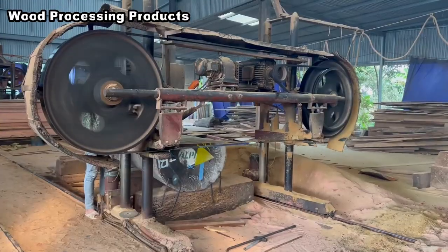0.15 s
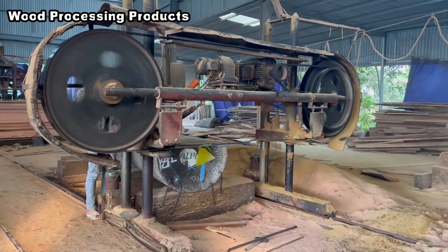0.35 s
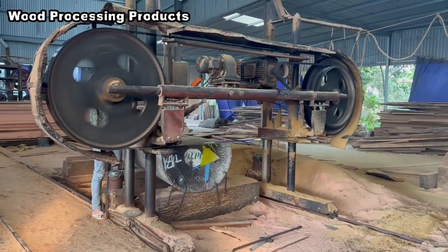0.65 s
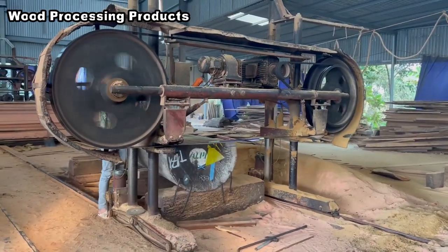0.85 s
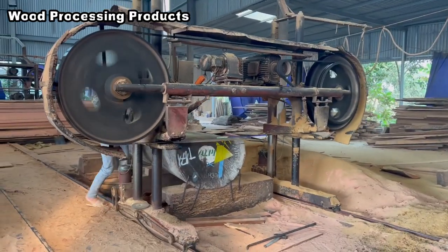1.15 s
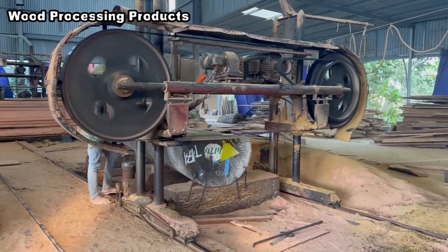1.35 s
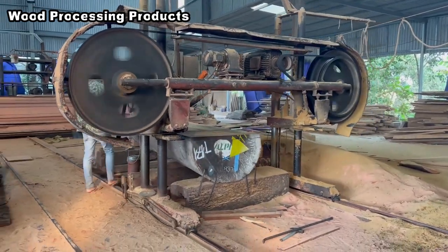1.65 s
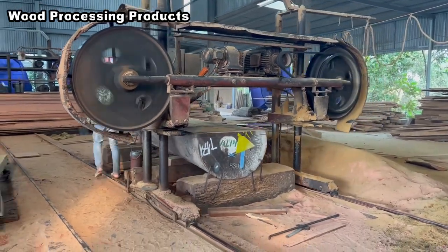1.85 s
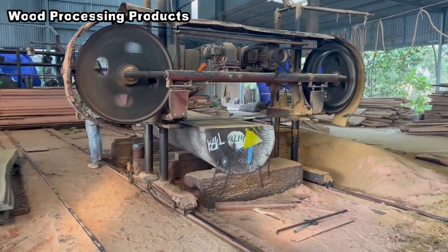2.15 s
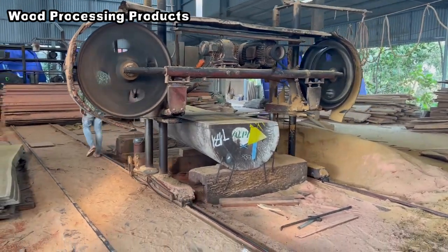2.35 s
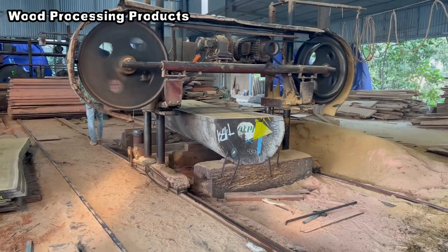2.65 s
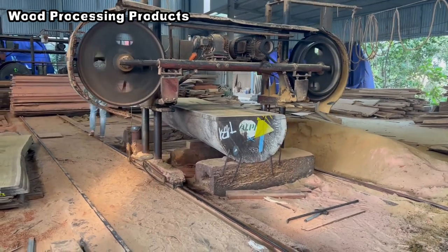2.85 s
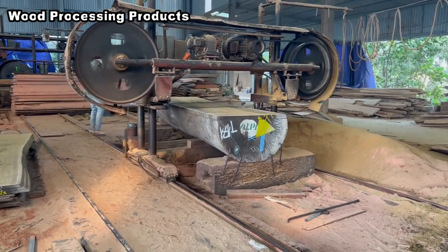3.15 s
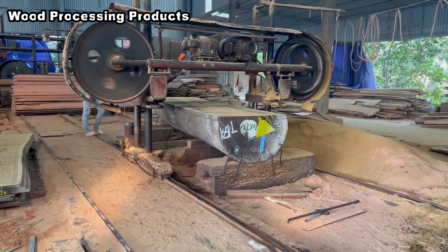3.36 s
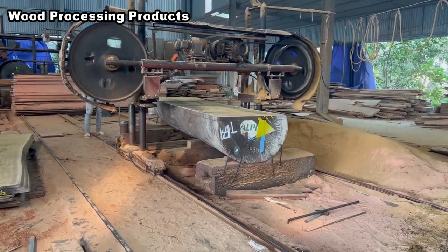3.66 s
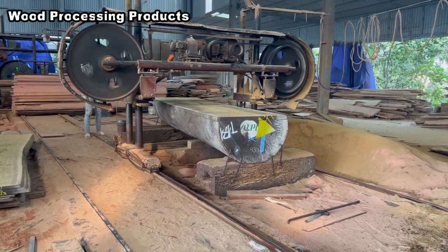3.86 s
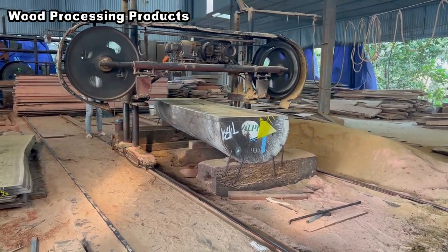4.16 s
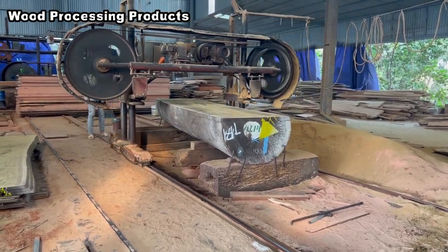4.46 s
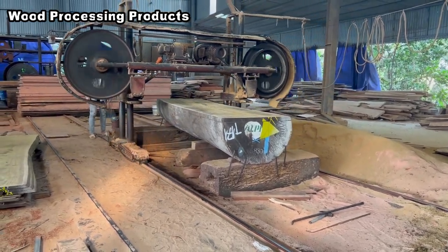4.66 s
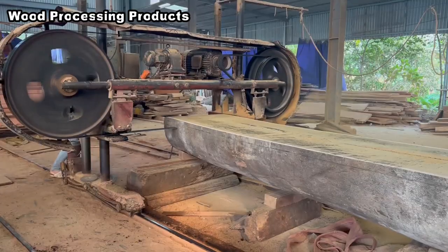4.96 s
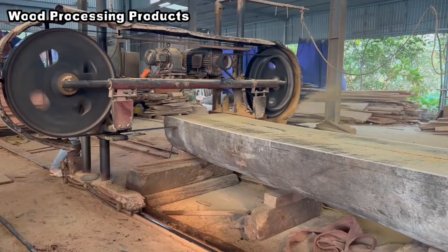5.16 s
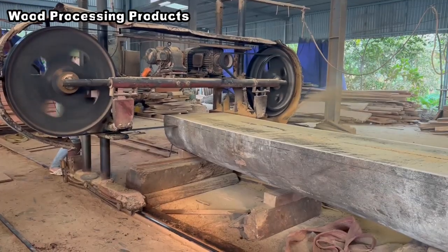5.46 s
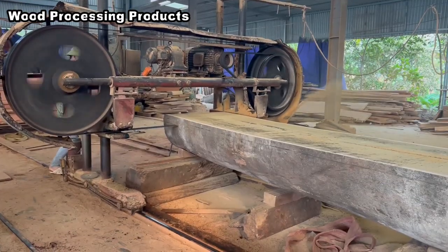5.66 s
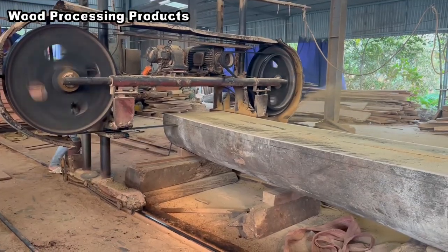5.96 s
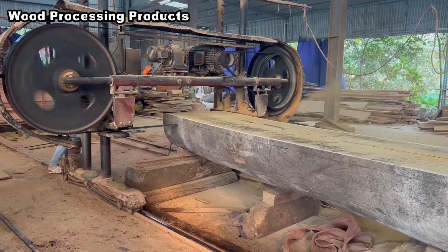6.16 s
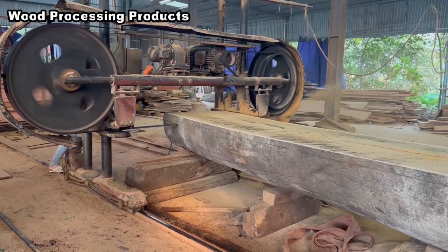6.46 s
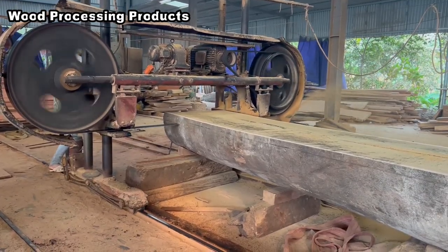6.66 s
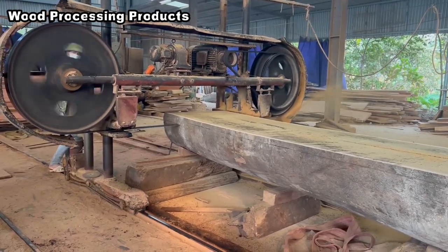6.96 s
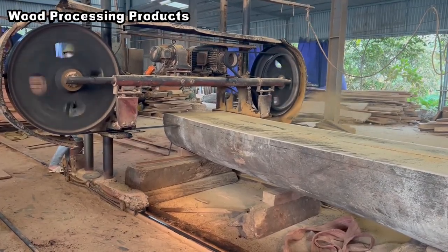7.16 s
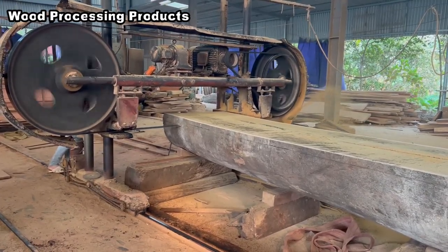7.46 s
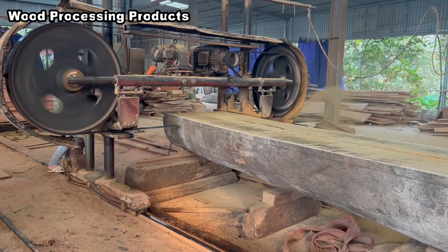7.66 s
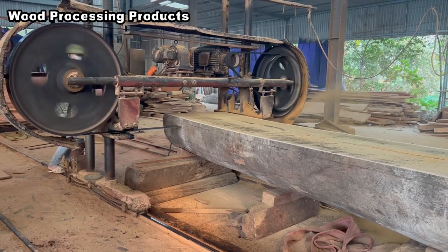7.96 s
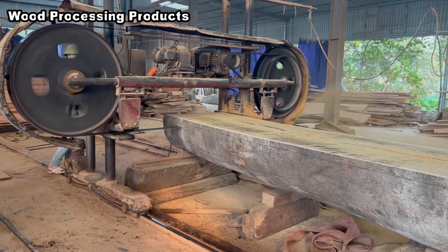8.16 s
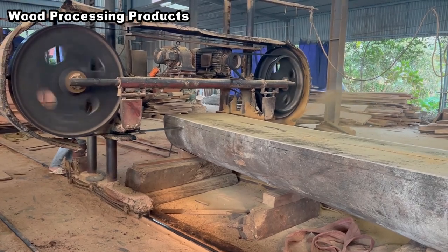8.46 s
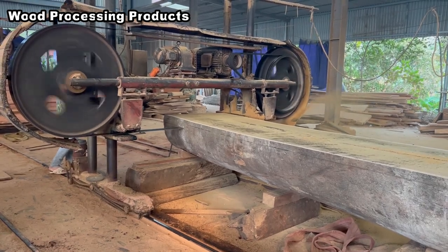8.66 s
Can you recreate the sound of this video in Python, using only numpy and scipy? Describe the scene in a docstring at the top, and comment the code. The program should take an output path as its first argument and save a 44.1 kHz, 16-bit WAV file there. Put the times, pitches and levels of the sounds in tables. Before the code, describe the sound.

A big band saw runs free in a timber shed, a little right of the microphone. From the start its steel band hisses and rings over a steady drive rumble, with thin wavering squeals and brief scrapes that swell around 1 second. At about 1.6 seconds the carriage jolts off with a quick, echoing clatter, then hums as it rolls. More faint squeals and rubbing come between 3 and 4.5 seconds. Just before 5 seconds the level dips for an instant, and abruptly the saw is cutting a log. The teeth give a thin, high whine that flutters rapidly under a bright, steady hiss of sawdust, while the band keeps ringing. The bite is slightly harder at first and eases around 6 seconds. The cutting continues to the end, near 9 seconds, with only a weak, patchy low rumble beneath it.

```python
"""A steel band hisses and rings through its guides: a big horizontal band saw running free in a tin-roofed
timber shed, a little right of the microphone. The drive rumbles; the carriage sets off with a clatter and
hums as it rolls back over the log. The level dips briefly near five seconds, then the saw is in the cut:
the teeth whine, fluttering with each turn of the wheels, under a bright hiss of sawdust. The recorder's
noise suppression leaves the cut thin, its low rumble weak and patchy."""
import sys
import numpy as np
from scipy import signal
from scipy.fft import rfft, irfft, next_fast_len
from scipy.io import wavfile
from scipy.ndimage import uniform_filter1d

SR = 44100
rng = np.random.default_rng(int(sys.argv[2]) if len(sys.argv) > 2 else 0)


def store_pcm(level_fs):
    """Save levels as 16-bit WAV."""
    pcm = np.round(np.clip(level_fs, -1, 1) * 32767).astype(np.int16)
    wavfile.write(sys.argv[1], SR, np.atleast_2d(pcm).T)


N = 388521
T = np.arange(N) / SR
SIZE = next_fast_len(N, real=True)
HZ = np.maximum(np.arange(SIZE // 2 + 1) * SR / SIZE, 1)

WHEEL_HZ, TOOTH_HZ = 6.19, 1101
ROLL_S, CUT_S = 1.53, 4.945  # the carriage sets off; the cut begins

# Bending modes of the steel band. Each row: pitch in Hz, relative dB running free, the same in the cut.
BAND_MODES = [(1524, -56, -60), (1647, -55, -58), (1819, -58, -59), (1879, -59, -63), (1948, -56, -56.5),
              (2033, -55, -62), (2085, -60, -57), (2221, -59, -57), (2343, -61, -61), (2544, -58, -71),
              (2605, -57, -64), (3071, -61, -62), (3216, -58, -58), (3252, -59, -60), (3357, -59, -59),
              (3507, -59, -59), (3646, -61, -58), (4317, -67, -59), (4463, -61, -64), (4535, -60, -78),
              (5133, -61, -60), (5209, -64, -60), (5285, -59, -63), (5365, -60, -64), (5445, -58, -70),
              (5516, -61, -66), (5674, -63, -68), (5830, -63, -68), (5905, -61, -63), (6059, -59, -64),
              (6135, -61, -60), (6626, -63, -65)]


def tooth_whine():
    """Teeth strike the wood in turn, in spurts that come round with the wheels; torn fibres rasp."""
    # Partials of the tooth rate. Each row: multiple, tone in dB, warble depth in Hz, then the rasp's
    # centre in Hz, width in Hz and level in dB.
    partials = [(1, -4.8, 6, 1170, 130, -5.4), (2, -2.8, 28, 2260, 160, -3), (3, -19, 40, 3400, 200, -19)]
    # Spurts of biting. Each row: place in the turn from 0 to 1, half-length in turns, pitch rise as
    # a share, fundamental in dB, overtones in dB.
    spurts = [(.03, .06, 0, -3, 1), (.12, .035, 0, -10, -4), (.2, .055, 0, 0, -2),
              (.29, .045, .003, -7, -2), (.4, .06, 0, 0, -2), (.54, .05, -.004, -6, -5),
              (.67, .04, .012, -3, -16), (.755, .045, 0, -8, -1), (.825, .04, .05, -5, -1),
              (.92, .045, .012, -9, -5)]
    turn = (T - 5.0) * WHEEL_HZ + .014 * walk(4)
    pulses = [np.exp(-(((turn - at + .5) % 1 - .5) / length) ** 2) for at, length, *_ in spurts]
    pitch_rise = sum(rise * pulse for (_, _, rise, _, _), pulse in zip(spurts, pulses))
    pace = 1 + pitch_rise + .007 * walk(600)
    chatter = undb(3 * walk(130))
    out = 0
    for k, tone_db, warble_hz, rasp_hz, width_hz, rasp_db in partials:
        phase = 2 * np.pi * np.cumsum(k * TOOTH_HZ * pace + warble_hz * walk(70)) / SR
        tone = np.sqrt(2) * np.sin(phase) * undb(tone_db)
        rasp = noise(np.sqrt(resonance(rasp_hz, width_hz))) * undb(rasp_db)
        bite = undb(-18)  # the floor between spurts
        for (*_, fundamental_db, overtone_db), pulse in zip(spurts, pulses):
            bite += pulse * undb((fundamental_db if k == 1 else overtone_db) + 1.6 * walk(12))
        out += shed(tone * unit(bite * chatter), t60=.3, wet_db=-13) + rasp * unit(bite ** .75)
    return unit(out)


def sawdust():
    """Sawdust sprays from the cut, a bright hiss that flutters with the wheels."""
    # Spectrum of the spray. Each row: frequency in Hz, relative level in dB.
    spray = [(600, -22), (800, 3), (1000, 6.5), (1250, 4.5), (1700, 5), (2400, 7.5), (3900, 6), (6200, 7),
             (6900, 5), (7900, 7), (9500, 5), (11200, 6), (12000, 10.5), (13700, 3.5), (15100, 10),
             (16000, -22)]
    return shaped(spray) * undb(.44 * each_turn(multiples=(6, 7, 8)))


def loaded_ring():
    """The band rings in the wood; a few modes sing on, changing level as it settles."""
    # Modes singing in the cut. Each row: pitch in Hz, dB before settling, dB after.
    song_modes = [(1300, -42.5, -50), (1432, -46.5, -46), (1561, -58, -56), (10056, -53, -53)]
    ring = ringing([(hz, db) for hz, _, db in BAND_MODES], width_hz=3.6, widen=.00047)
    settled = ramp(6.33, .5)
    song = sum(ringing([(hz, before)], width_hz=6.1, widen=.001) * undb((after - before) * settled)
               for hz, before, after in song_modes)
    return ring * undb(10) + song


def cutting():
    """Sawdust, band and teeth in the log; the teeth bite harder at first, then ease off."""
    hard_bite = 1 - ramp(CUT_S + .72, .75)
    dust = sawdust() * undb(-27 + 1.24 * hard_bite)
    ring = loaded_ring()
    whine = tooth_whine() * undb(-33.5 + 2.5 * hard_bite)
    # the saw's sound in the cut is thin, with almost nothing below 960 Hz
    low_cut = signal.butter(14, 960, "high", fs=SR, output="sos")
    return signal.sosfilt(low_cut, dust + ring + whine)


def guide_hiss(mode_count=80):
    """The free band hisses through its guides; pressure brings out a crowd of its high modes."""
    # Spectrum of the friction. Each row: frequency in Hz, relative level in dB.
    friction = [(600, -27), (1300, 5.5), (1900, 7.5), (2400, 4.5), (2800, 6.5), (3300, 4.5), (4100, 2.5),
                (5500, 3.5), (7200, 3), (8300, 3.5), (9400, 0), (10800, 2.3), (12500, -0.5), (13500, -0.5),
                (16000, -6)]
    press = pressure()
    hiss = shaped(friction) * undb(.25 * each_turn(multiples=(1, 5, 7)) + .55 * walk(30))
    mode_hz = 2400 * (7300 / 2400) ** ((np.arange(mode_count) + rng.random(mode_count)) / mode_count)
    mode_db = 2 * rng.standard_normal(mode_count)
    crowd = unit(shifting_ring(list(zip(mode_hz, mode_db)), spread_db=3.5, groups=6))
    return (hiss * undb(-.5 + 2.5 * press) + crowd * undb(-10 + 12 * press)) * undb(-31 + rolling())


def free_ring():
    """The unloaded band rings in its bending modes, a little louder as it leans on the guides."""
    ring = shifting_ring([(hz, db) for hz, db, _ in BAND_MODES], spread_db=2.3, groups=5)
    return ring * undb(6.5 + 1.5 * pressure())


def singing_modes():
    """The guides rub single modes close to self-oscillation: thin, wavering tones that can squeal."""
    # Rubbed modes. Each row: pitch in Hz, dB with the carriage standing, dB with it rolling,
    # dB added by full pressure.
    modes = [(412, -41, -51, 1), (1303, -52, -44.5, 0), (1432, -46, -56, 1), (1524, -50, -60, 0),
             (1948, -54, -59, 5), (2035, -57, -51, 2), (2221, -53, -58, 1), (2544, -64, -57, 1),
             (2611, -60, -56, 3), (2789, -53, -60, 1), (3216, -56, -58, 3), (4533, -68, -62, 12),
             (6385, -49, -57, 3)]
    # Cleaner, louder spells. Each row: start in seconds, length in seconds, Hz near which modes
    # squeal, boost in dB of which tone and halo each take a share.
    squeals = [(.45, 1.2, 1432, 6), (.78, 0.11, 1948, 15), (.95, 0.37, 2221, 12.5), (1.08, .5, 1524, 1.5),
               (2.75, 0.36, 2035, 9), (3.1, .2, 2221, 14), (3.25, 0.29, 2611, 10), (3.79, .5, 2035, 6),
               (2.81, 0.49, 1303, 8), (3.886, 0.54, 1303, 8), (4.603, 0.52, 1303, 6), (.22, 0.58, 2789, 13),
               (.65, .55, 6385, 10.5), (1.0, .25, 3216, 4), (1.85, .3, 1524, 18), (3.5, 0.52, 2544, 10),
               (3.92, .45, 3216, 14), (4.0, .15, 4533, 20)]
    speed, press = rolling(), pressure()
    edge_s = .088
    out = 0
    for hz, standing_db, rolling_db, press_db in modes:
        db = standing_db + (rolling_db - standing_db) * speed + press_db * press + .6 * walk(5)
        if hz < 500:  # the lowest mode is fed by the drive and all but dies in its lull
            db -= 18 * lull()
        boost_db = sum(peak_db * (ramp(s, edge_s) - ramp(s + length, edge_s))
                       for s, length, squeal_hz, peak_db in squeals if abs(squeal_hz / hz - 1) < .03)
        tone = np.sqrt(2) * np.sin(2 * np.pi * np.cumsum(hz + .9 * walk(12)) / SR)
        halo = noise(np.sqrt(resonance(hz, 12))) * undb(.35 * boost_db - 4)
        tone *= undb(.9 * boost_db - 3.5 + 1.2 * walk(30))
        out += undb(db) * (tone + halo)
    return out


def guide_rub(start_hz=6380, end_hz=5470, width_hz=370):
    """Narrow friction noise grows with pressure and slides down as the band shifts in its guides."""
    centre_hz = start_hz + (end_hz - start_hz) * ramp(2.9, .97)
    base_hz = 2000  # the noise is made here, then shifted up
    rub = signal.hilbert(noise(np.sqrt(resonance(base_hz, width_hz))), SIZE)[:, :N]
    sliding = np.real(rub * np.exp(2j * np.pi * np.cumsum(centre_hz - base_hz) / SR))
    return sliding * undb(-42.5 + 9.5 * pressure())


def scrapes(mode_width_hz=16, rough_db=-9):
    """The band brushes harder for a moment; each rub is coloured by the modes within its reach."""
    # Brief rubs. Each row: peak time and length in seconds, centre and width in Hz, level in dB.
    rubs = [(0.138, 0.063, 507, 50, -36.5), (0.39, 0.04, 3940, 2000, -29.5),
            (0.686, 0.032, 1270, 500, -33.5), (0.836, 0.05, 1740, 500, -33),
            (0.913, 0.051, 5430, 3520, -32), (1.1, .2, 5300, 400, -43), (1.126, 0.068, 327, 40, -41),
            (2.166, 0.062, 258, 30, -39), (2.173, 0.11, 6150, 300, -39), (2.285, 0.028, 3000, 1500, -36),
            (2.33, .08, 5380, 250, -41), (2.5, 0.33, 11350, 600, -41), (3.25, .07, 5650, 1200, -36),
            (3.3, 1.2, 10750, 500, -47), (3.44, .12, 5300, 300, -40), (3.72, 0.37, 5830, 550, -36.5),
            (4.02, 0.32, 5500, 500, -39), (4.08, 0.17, 6080, 150, -41), (3.7, 0.64, 4450, 500, -42),
            (4.05, 0.08, 4480, 700, -35.5)]
    mode_power = mode_width_hz * sum(resonance(hz, mode_width_hz) for hz, *_ in BAND_MODES)
    band_power = mode_power + undb(rough_db) ** 2
    out = 0
    for s, length, hz, width, db in rubs:
        rub = noise(np.sqrt(resonance(hz, width / 2) * band_power))
        out += rub * undb(db) * np.exp(-2 * ((T - s) / length) ** 2)
    return out


def clatter(contact_s=.046, crack_db=-.5, db_per_octave=10.5):
    """The carriage jolts into motion: quick, rough blows, each ringing the modes at its own spot."""
    # Blows. Each row: start in seconds, level in dB, Hz of the modes struck hardest.
    blows = [(1.580, -28.5, 920), (1.598, -30.5, 1350), (1.617, -32.5, 340), (1.640, -29.5, 926),
             (1.662, -36, 1500), (1.700, -39, 480), (1.738, -35, 600), (1.760, -38, 690),
             (1.786, -45, 1400), (1.812, -37, 450), (1.868, -35, 660)]
    # Modes of the carriage. Each row: pitch in Hz, seconds to fall 60 dB, relative level in dB.
    modes = [(182, 0.22, -14), (323, 0.23, -2), (368, 0.23, 2), (486, 0.3, 1), (600, .2, -9),
             (677, 0.25, -5), (884, .16, 2), (928, 0.12, 4), (1240, 0.18, -3), (1518, .3, -5),
             (1980, 0.27, -11)]
    t = T[:SR // 2]
    attack = 1 - np.exp(-t / .001)
    out = np.zeros(N)
    for s, db, spot_hz in blows:
        ring = 0
        for (hz, t60, mode_db), phase in zip(modes, rng.uniform(0, 2 * np.pi, len(modes))):
            struck_db = mode_db - db_per_octave * abs(np.log2(hz / spot_hz))
            ring += undb(struck_db - 60 * t / t60) * np.sin(2 * np.pi * hz * t + phase)
        crack_filter = signal.butter(2, [spot_hz / 2, spot_hz * 1.84], "band", fs=SR, output="sos")
        crack = unit(signal.sosfilt(crack_filter, rng.standard_normal(len(t)))) * np.exp(-t / contact_s)
        start = int(s * SR)
        out[start:start + len(t)] += undb(db) * (ring + undb(crack_db) * crack) * attack
    return shed(out, t60=1.1, wet_db=-6)


def carriage_hum():
    """The carriage frame hums, louder once it rolls, and swells once soon after setting off."""
    # Modes of the frame. Each row: pitch in Hz, relative level in dB.
    modes = [(263.8, -53.5), (484.5, -55), (522.2, -53), (597.5, -48.5), (635.2, -51), (672.9, -49.5),
             (826, -52.5), (860, -55), (899, -52.5), (1384, -53)]
    hum = ringing(modes, width_hz=3.2, widen=.00096)
    return hum * undb(-7 + 9.5 * rolling() + 3 * swell(2.47, .18))


def drive_rumble():
    """The unloaded drive rumbles, sinking in its lull and a little softer while the carriage rolls."""
    # Spectrum of the drive. Each row: frequency in Hz, relative level in dB.
    spectrum = [(25, -46), (50, -38), (75, -25), (100, -12.5), (140, -3.5), (220, -0.5), (400, -2),
                (650, -1.5), (1100, -3.5), (2000, -14), (4000, -46)]
    return shaped(spectrum) * undb(-36 - 1.5 * rolling() - 2.5 * lull() + .96 * walk(24.95))


def suppressed_rumble(band_count=13, reach_hz=620, sink_db_per_s=.9):
    """A weak low rumble, broken into flickering patches by the recorder's noise suppression."""
    # Spectrum of the rumble. Each row: frequency in Hz, relative level in dB.
    colour = [(25, -36), (60, -25), (100, -25), (140, -3.5), (205, 6.5), (270, 2.5), (340, 1), (450, -3),
              (560, 4), (680, -5), (800, 8), (950, 3), (1100, -5), (2000, -59)]
    # Brief swells and dips. Each row: peak time and half-length in seconds, dB in the lowest band.
    surges = [(5.27, .05, -9), (5.446, 0.085, 11.5), (6.007, 0.081, -4), (6.56, .06, -0.5),
              (7.678, 0.068, 8.5), (7.88, .05, 1), (8.42, 0.042, -9)]
    spectrum = rfft(shaped(colour), SIZE)
    edges_hz = np.append(np.linspace(0, 950, band_count), SR)
    surge_db = sum(db * swell(s, length) for s, length, db in surges)
    out, below = 0, walk(30)
    for low, high in zip(edges_hz, edges_hz[1:]):
        above = walk(30)
        floor = .15 if 140 < low < 240 else .01  # the deep hum is steadier
        opening = floor + (1 - floor) * (1 + np.tanh(1.6 * (below + above) + .1)) / 2
        surge = undb(surge_db * np.exp(-(low / reach_hz) ** 2))
        band = irfft(spectrum * (HZ >= low) * (HZ < high), SIZE)[:, :N]
        out += band * opening * surge
        below = above  # neighbours share their random drop-outs
    return unit(out) * undb(-43 - sink_db_per_s * (T - CUT_S) + .13 * walk(7.2))


def shed(x, t60, wet_db):
    """The microphone hears the direct sound plus the diffuse echo of the roof and the timber stacks."""
    t = T[:SR]
    tail = rng.standard_normal((2, SR)) * undb(-60 * t / t60) * (t > .004)
    tail /= np.sqrt(np.sum(tail ** 2, axis=1, keepdims=True))
    return x + undb(wet_db) * signal.fftconvolve(x[None], tail, axes=1)[:, :N]


def placed(x, balance):
    """Sets a sound between left and right at the microphone, frequency by frequency."""
    gains = undb(across(balance, HZ) * np.array([[.5], [-.5]]))
    return irfft(rfft(x, SIZE) * gains, SIZE)[:, :N]


def pressure():
    """How hard the band leans on its guides, 0-1: it bears down, then lets go."""
    # Presses. Each row: peak time, rise and fall in seconds, then strength from 0 to 1.
    presses = [(.91, 0.22, 0.33, 0.7), (4.06, 0.27, 0.21, 0.43)]
    return sum(strength * np.exp(-np.maximum((s - T) / rise, (T - s) / fall))
               for s, rise, fall, strength in presses)


def rolling(start_up_s=.28):
    """Speed of the carriage, 0-1."""
    return ramp(ROLL_S + start_up_s / 2, start_up_s)


def lull():
    """The drive eases just before the carriage sets off, 0-1."""
    return swell(ROLL_S - .14, .24)


def each_turn(multiples):
    """An uneven flutter on multiples of the wheel rate; rms 1."""
    phases = rng.uniform(0, 2 * np.pi, len(multiples))
    return unit(sum(np.cos(2 * np.pi * k * WHEEL_HZ * T + phase + .3 * walk(3))
                    for k, phase in zip(multiples, phases)))


def shifting_ring(modes, spread_db, groups):
    """Modes swell and fade in interleaved groups, so the metallic colour keeps shifting."""
    return sum(ringing(modes[k::groups], width_hz=3.4, widen=.0008) * unit(undb(spread_db * walk(5)))
               for k in range(groups))


def ringing(modes, width_hz, widen):
    """Modes (Hz, dB) kept ringing by friction; higher ones are damped more."""
    power = sum(undb(db) ** 2 * resonance(hz, width_hz + widen * hz) for hz, db in modes)
    return noise(np.sqrt(power)) * np.sqrt(sum(undb(db) ** 2 for _, db in modes))


def resonance(hz, width_hz):
    """Power response of a mode with steep skirts; its area does not depend on the width."""
    return 1 / (1 + ((HZ - hz) / width_hz) ** 2) ** 2 / width_hz


def noise(gain):
    """Stereo noise of rms 1 with a gain per frequency; the treble is wider than the bass."""
    # Likeness of left and right at the microphone. Each row: frequency in Hz, likeness from 0 to 1.
    likeness = [(30, 0.4), (130, 0.97), (300, 0.77), (700, 0.79), (1400, 0.42), (3000, 0.42), (7000, 0.11),
                (15000, 0.23)]
    alike = across(likeness, HZ)
    mid, side = rng.standard_normal((2, len(HZ))) + 1j * rng.standard_normal((2, len(HZ)))
    mid, side = mid * np.sqrt(1 + alike), side * np.sqrt(1 - alike)
    return unit(irfft(gain * np.array([mid + side, mid - side]), SIZE)[:, :N])


def shaped(points):
    """Noise with a (Hz, dB) spectrum."""
    return noise(undb(across(points, HZ)))


def walk(rate):
    """Random levels held 1 / rate seconds and smoothed twice; rms 1."""
    hold = max(int(SR / rate), 2)
    steps = np.repeat(rng.standard_normal(N // hold + 1), hold)
    return unit(uniform_filter1d(uniform_filter1d(steps, hold), hold)[:N])


def ramp(s, length_s):
    """A smooth step from 0 to 1, centred on s."""
    return .5 + .5 * np.sin(np.pi * np.clip((T - s) / length_s, -.5, .5))


def swell(s, half_length_s):
    """A bell-shaped rise and fall, 1 at s."""
    return np.exp(-((T - s) / half_length_s) ** 2)


def across(points, hz):
    """A (Hz, value) table read on a log-frequency axis."""
    point_hz, value = np.transpose(points)
    return np.interp(np.log(hz), np.log(point_hz), value)


def undb(db):
    """Decibels to gain."""
    return 10 ** (np.asarray(db) / 20)


def unit(x):
    """Scale to rms 1."""
    return x / np.sqrt(np.mean(x ** 2))


def scene():
    """The saw runs free, the level dips briefly, then the saw is in the cut."""
    # The saw stands a little to the right; the bass of the cut leans left.
    # Each row: frequency in Hz, left minus right in dB.
    free_balance = [(100, 0), (700, -1.5), (1300, -1.5), (4400, -3), (8000, -3.5), (15000, 0.5)]
    cut_balance = [(100, 6), (700, -2), (4400, -2.5), (8000, -2), (15000, -0.5)]
    free = drive_rumble() + guide_hiss() + free_ring() + carriage_hum()
    free += singing_modes() + guide_rub() + scrapes() + clatter()
    cut = cutting() + suppressed_rumble()
    dip_s, dip_db = 4.93, -10
    before_dip = np.clip((dip_s - T) / .002 + .5, 0, 1)
    cut_gain = np.clip((T - CUT_S) / .008 + .3, 0, 1)
    free_gain = before_dip + undb(dip_db) * (1 - before_dip) * (1 - cut_gain)
    return placed(free, free_balance) * free_gain + placed(cut, cut_balance) * cut_gain


def record(dry):
    """The recorder cuts the treble steeply above 15.9 kHz."""
    return signal.sosfilt(signal.ellip(10, .2, 75, 15900, fs=SR, output="sos"), dry)


dry = scene()
out = record(dry)
store_pcm(out)
```